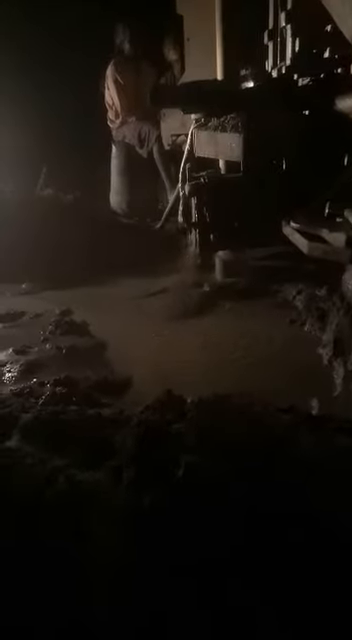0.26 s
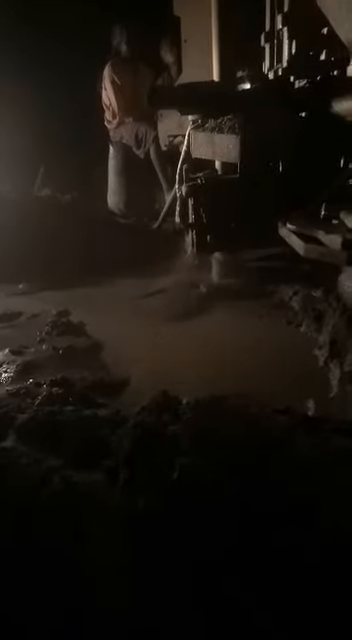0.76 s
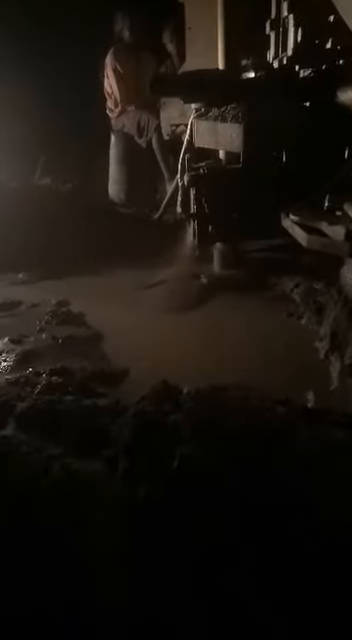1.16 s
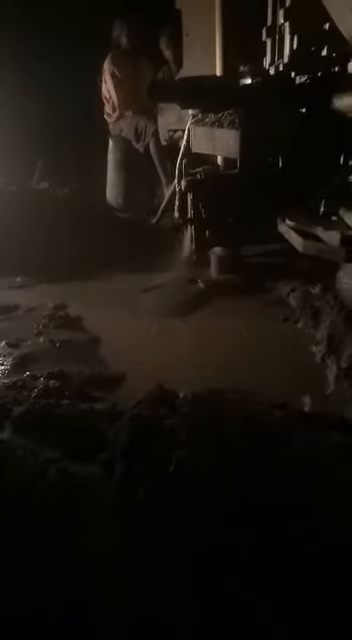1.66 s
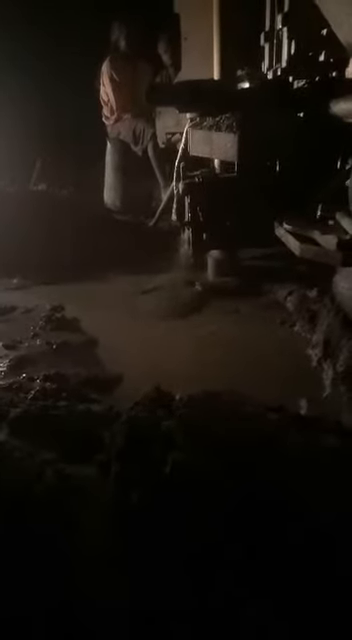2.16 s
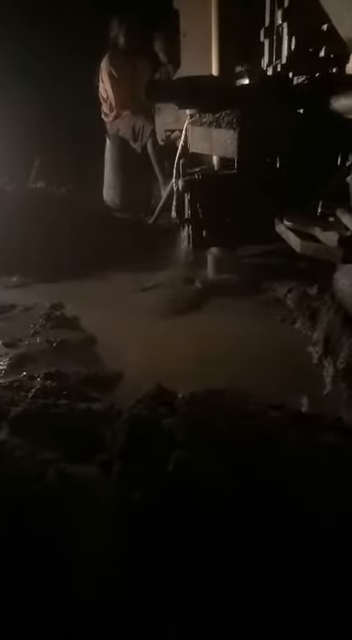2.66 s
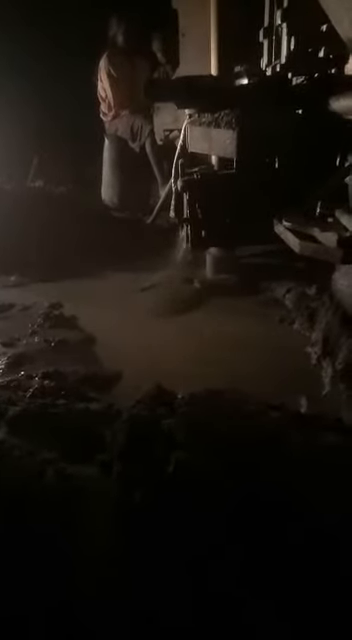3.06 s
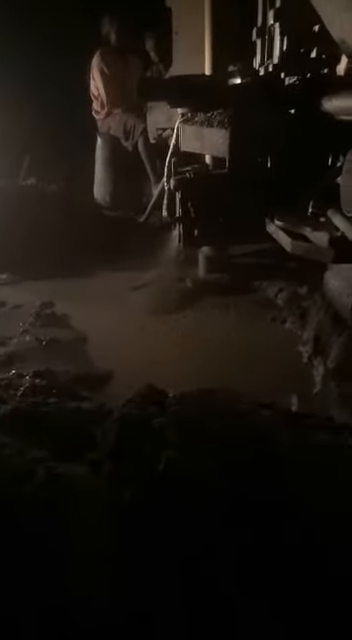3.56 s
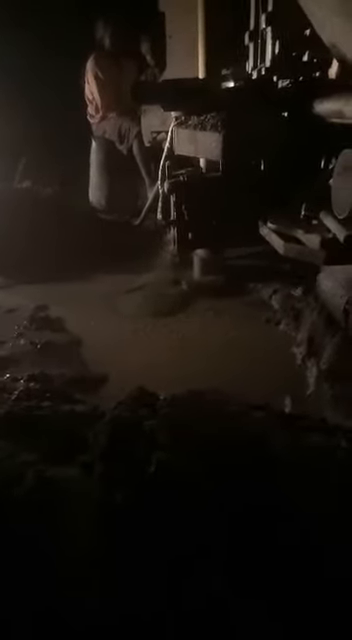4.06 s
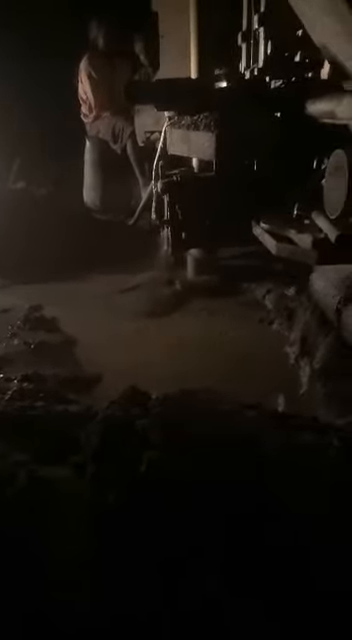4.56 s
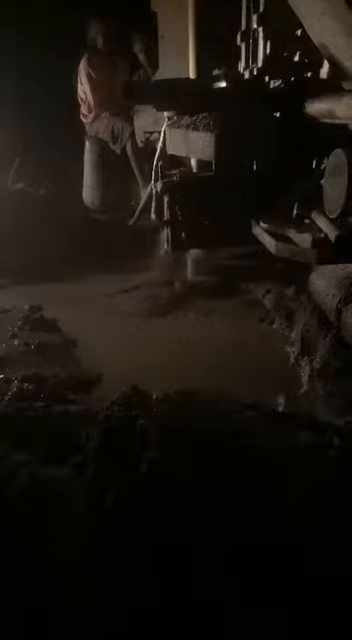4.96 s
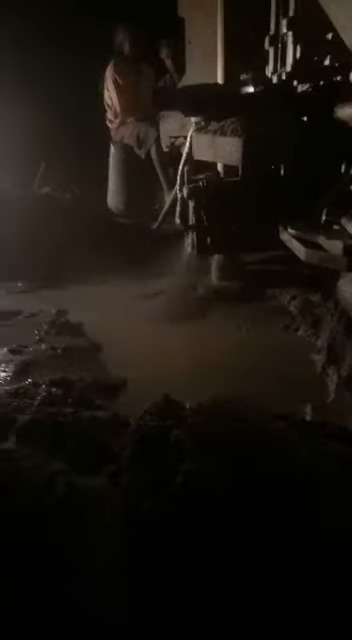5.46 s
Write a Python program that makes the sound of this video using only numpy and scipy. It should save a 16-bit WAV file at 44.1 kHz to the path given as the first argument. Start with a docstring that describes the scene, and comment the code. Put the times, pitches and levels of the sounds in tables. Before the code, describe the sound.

Dense, continuous machinery noise: low engine hum and hollow roaring from a frame and silencer, with a coarse bright rattle of covers and chains on top. Metallic squeals from the turning pipe come and go, irregular steel clanks break through, and the silencer hoots now and then. The pump hum sinks several times and the rattle eases at the end. Outdoor phone pickup from a few metres, limited on peaks.

```python
"""A drilling rig works at night beside its mud pit, heard for 5.7 s a few metres from a hand-held phone.
From the start sine waves hum for a six-cylinder diesel, a second engine and a pump, and whine for fast parts;
noise rings the booming frame, clicks and noise ring rattling steel and fill the din, and struck steel clanks.
At 0.1 s the rubbed drill pipe, noise and tones at four pitches, first sings out; at 0.2 s the roar dips.
From 0.6 s the silencer hoots now and then; the pump's hum sinks near 1.3, 2.15, 4 and 5 s; the rattle eases last."""
import sys
import numpy as np
from scipy import signal
from scipy.fft import rfft, irfft
from scipy.io import wavfile
from scipy.ndimage import uniform_filter1d, minimum_filter1d, map_coordinates

SR = 44100
rng = np.random.default_rng(int(sys.argv[2]) if len(sys.argv) > 2 else 0)


def master(y):
    """Save y as 16-bit WAV."""
    cut = np.clip(np.atleast_2d(y).T, -1, 1)
    pcm = np.round(cut * 32767)  # scale
    wavfile.write(sys.argv[1], SR, pcm.astype(np.int16))


N = 251811
TIME = np.arange(N) / SR
FREQ = np.maximum(np.fft.rfftfreq(N, 1 / SR), 1)  # in Hz, kept above zero for logs and division

CYCLE_HZ = 12.316  # main diesel: one four-stroke cycle, six firings
SHAFT_HZ = 29.3  # second engine
PUMP_HZ = 26.11  # pump shaft, eight vanes


def amp(db):
    """Turn decibels into a gain."""
    return 10 ** (np.asarray(db) / 20)


def unit(x):
    """Scale each channel to an average (rms) level of 1."""
    return x / np.sqrt(np.mean(x ** 2, axis=-1, keepdims=True))


def pan(db):
    """Left and right gains for a given left minus right difference in dB."""
    return amp(np.array([[0.5], [-0.5]]) * db)


def swells(table, depth=1):
    """Turn each level column into a gain around its own mean; depth scales its dB."""
    seconds, *columns = np.transpose(table)
    return [unit(amp(depth * np.interp(TIME, seconds, column))) for column in columns]


def spectrum(table):
    """Join each column of a table over log frequency."""
    hz, *columns = np.transpose(table)
    return [np.interp(np.log(FREQ), np.log(hz), column) for column in columns]


def bumps(events):
    """Add up rounded changes in dB, each with a middle, a length at half height and a size."""
    return sum(db * 0.5 ** ((2 * (TIME - middle) / length) ** 2) for middle, length, db in events)


def walk(rate):
    """Smooth chance movement of spread 1; a higher rate in Hz moves faster."""
    coarse = TIME[::100]
    hz = np.fft.rfftfreq(len(coarse), coarse[1])
    smoothing = np.exp(-(hz / rate) ** 2)
    slow = irfft(rfft(rng.standard_normal(len(coarse))) * smoothing, len(coarse))
    return unit(np.interp(TIME, coarse, slow))


def turns(hz, wobble, rate):
    """Count the turns of something steady that runs slightly ahead and behind."""
    return hz * TIME + wobble * walk(rate)


def strokes(turn, decay, scatter_db):
    """One blow on every turn, each of its own strength, dying away within a share of the turn."""
    number = np.floor(turn - np.floor(turn.min())).astype(int)
    size = amp(scatter_db * rng.standard_normal(number.max() + 1))
    return size[number] * np.exp(-(turn % 1) / decay)


def repeating(turn, size=2048):
    """The same random jolts on every turn."""
    jolts = rng.standard_normal(size)
    return unit(map_coordinates(jolts, [turn % 1 * size], order=1, mode="grid-wrap"))


# How sound reaches the phone's two microphone ports.
# Each row: frequency in Hz, likeness of the ports from 0 to 1, lead of the right port in ms.
PORTS = [(60.4, 0.97, .2), (220, 0.98, 0.3), (508, 0.98, 0.43), (700, 0.71, 0.21), (970, 0.31, 0.39),
         (1970, 0.4, 0.54), (5970, 0.25, 0.49)]


def ports(pair):
    """Spectra at the two ports: the bass arrives alike, the treble by unrelated reflections."""
    like, lead_ms = spectrum(PORTS)
    direct, scattered = rfft(pair)
    lead = np.exp(2j * np.pi * FREQ * lead_ms / 1000)
    return np.array([direct, like * lead * direct + np.sqrt(1 - like ** 2) * scattered])


def resonance(hz, width):
    """Response of one steep resonance."""
    return 1 / (1 + 1j * (FREQ / hz - hz / FREQ) * hz / width) ** 2


def ring(drive, hz, width, db, pan_db):
    """Ring one resonance at its level and place."""
    return unit(irfft(drive * resonance(hz, width), N)) * amp(db) * pan(pan_db)


def driven(sound, strength, hold_s):
    """Over spans longer than hold_s, the energy of a vibration follows the strength of its drive."""
    power = uniform_filter1d(np.mean(sound ** 2, axis=0), int(hold_s * SR) + 1)
    return sound * strength / unit(np.sqrt(power))


def drone(turn, rate_hz, orders, waver_db, lead_ms=0.29, pan_db=5.5):
    """Clean harmonics of one machine; the higher ones waver more with the load."""
    out = 0
    for multiple, db in orders:
        hz = multiple * rate_hz
        lead = np.array([[0], [hz * lead_ms / 1000]])  # in cycles, for the right port
        waver = waver_db * walk(4) * hz / 200  # waver_db is the spread at 200 Hz
        out = out + amp(db + waver) * np.sin(2 * np.pi * (multiple * turn + lead + rng.random()))
    return np.sqrt(2) * out * pan(pan_db)


def impacts(jolts, clicks_per_s=2500):
    """Dense small metal impacts over rushing air, bunched after each jolt of the engines."""
    clicks = (rng.random((2, N)) < clicks_per_s / SR) * rng.uniform(-0.92, 1, (2, N))
    rushing = rng.standard_normal((2, N))
    return ports(unit((1 + jolts) * (unit(clicks) + rushing)))


# Slow level of the loose parts; only its changes count, scaled by a depth.
# Each row: time in seconds, then heavy, middle and light parts in dB.
RATTLE_LEVEL = [(0.0, -28.5, -21, -29.5), (0.12, -21, -22, -24.5), (0.3, -23.5, -19.5, -30.5),
                (1.35, -23, -21, -24.5), (1.9, -21.5, -19, -24), (2.6, -23.5, -18, -25.5),
                (3.3, -22.5, -21.5, -24.5), (4.2, -22, -19.5, -28), (4.4, -24, -19.5, -23.5),
                (4.65, -24, -17.5, -23), (5.35, -22, -17.5, -22.5), (5.71, -24.5, -23, -31.5)]
# The whole rattle flares up or lets off.
# Each row: middle in seconds, length in seconds, change in dB.
FLURRIES = [(0.43, 0.02, -3), (0.76, 0.016, -1.5), (2.33, 0.049, -3), (2.89, 0.04, 0.5), (3.09, 0.054, 5),
            (3.52, 0.07, -2.5), (4.25, 0.044, -2), (4.605, 0.025, -1.5), (4.69, 0.031, -3)]
# Loose steel of middle weight clatters briefly, or once eases.
# Each row: middle in seconds, length in seconds, change in dB.
CLATTERS = [(0.098, 0.054, 7), (0.678, 0.045, 3), (0.893, 0.059, 5.5), (1.27, 0.028, 4),
            (1.355, 0.045, 4.5), (1.665, 0.046, 7), (1.841, 0.035, 4), (2.05, 0.03, 4), (2.122, 0.039, 2.5),
            (2.828, 0.04, 4), (3.039, 0.03, -1), (3.249, 0.028, 9), (3.444, 0.053, 5.5), (3.787, 0.029, 9),
            (4.406, 0.037, 7.5), (4.946, 0.036, 1), (5.42, 0.055, 2)]


def rattling(depth):
    """Strength of the heavy, middle and light loose parts; all share the flurries, the middle ones clatter."""
    heavy, middle, light = swells(RATTLE_LEVEL, depth)
    flurry = amp(bumps(FLURRIES))
    return [unit(part * flurry) for part in (heavy, middle * amp(bumps(CLATTERS)), light)]


# Broad mechanical noise between the resonances.
# Each row: frequency in Hz, level in dB per Hz, left minus right in dB.
DIN = [(20.0, -89, -2), (42.0, -70.5, 2), (109, -56, 7), (200.0, -53, 4.5), (576, -54.5, 10),
       (800, -56.5, 1), (1700, -64, 10), (2245, -62, 15.5), (3660, -66.5, 2.5), (4520, -71, 4),
       (6490, -88, 2), (8100, -104, -3), (11700, -100.8, -11), (14800.0, -104.2, 14)]


def din(jolts, centre_hz=3200, width_hz=3500, flutter_db=2.3, shaken=0.52):
    """Fans, mud flow and valve gear fill the gaps; the bright band follows the rattle, the rest stays even."""
    db, pan_db = spectrum(DIN)
    sound = impacts(shaken * jolts) * amp(db) * pan(pan_db) * np.sqrt(SR / 2)
    bright = 1 / (1 + ((FREQ / centre_hz - centre_hz / FREQ) * centre_hz / width_hz) ** 2)
    light = rattling(depth=0.29)[-1]
    swell = light * amp(flutter_db * walk(23))
    return irfft(sound * (1 - bright), N) + swell * irfft(sound * bright, N)


# Gear and turbocharger whines.
# Each row: frequency in Hz, level in dB, left minus right in dB.
WHINES = [(763.6, -45, 4), (2737, -53.5, 10), (3198, -45.3, 9), (3746, -56, 9), (3880, -57, 8),
          (5237, -60, 10), (9405, -81, 2)]


def whines(wobble_turns=0.29, waver_db=3):
    """Thin, unsteady tones of fast-turning parts."""
    out = 0
    for hz, db, pan_db in WHINES:
        tone = np.sin(2 * np.pi * turns(hz, wobble_turns, 4.7))
        out = out + unit(tone * amp(waver_db * walk(21))) * amp(db) * pan(pan_db)
    return out


# Clean tones of the pump. Each row: multiple of its shaft rate, level in dB.
PUMP = [(1, -57), (3, -53), (8, -34.5)]
# Slow level of the pump's hum; only its changes count. Each row: time in seconds, level in dB.
PUMP_LEVEL = [(0, -32.5), (0.85, -33.5), (1.3, -52), (1.7, -34), (2.15, -61), (2.45, -36), (2.75, -30.5),
              (3.2, -31.5), (3.42, -40), (3.65, -31), (4.0, -49), (4.55, -34), (4.95, -46), (5.25, -41),
              (5.71, -37)]


def pump_hum(turn):
    """The pump's shaft and its eight passing vanes hum, sinking now and then."""
    return drone(turn, PUMP_HZ, PUMP, waver_db=1.2) * swells(PUMP_LEVEL)[0]


# Clean tones of the second engine. Each row: multiple of its shaft rate, level in dB.
SECOND_ENGINE = [(2, -49.5), (8, -37.5)]
# Its hum swells or sinks. Each row: middle in seconds, length in seconds, change in dB.
SECOND_SWELLS = [(0.4, 0.2, -2), (1.08, 0.16, 7), (1.85, 0.08, 7), (2.2, 0.11, 6), (2.6, 0.12, 8),
                 (3.25, 0.093, 2)]


def second_engine(shaft):
    """The second engine hums at multiples of its shaft rate."""
    return drone(shaft, SHAFT_HZ, SECOND_ENGINE, waver_db=2.0) * unit(amp(bumps(SECOND_SWELLS)))


# The pipe catches and one mode sings out.
# Each row: middle in seconds, length in seconds, rough mode frequency in Hz, rise in dB.
SQUEALS = [(0.113, 0.078, 2237, 8.5), (0.144, 0.08, 1832, 3), (0.646, 0.056, 2237, 7.5),
           (0.9, 0.17, 1371, 5), (1.11, 0.042, 1832, 6.5), (1.01, 0.08, 2237, 5.5), (1.17, 0.33, 2237, 7.5),
           (1.46, 0.1, 2237, 3.5), (1.633, 0.22, 1832, 4), (2.3, 0.12, 2237, 4), (1.792, 0.035, 2237, 10),
           (2.815, 0.085, 1832, 6.5), (3.0, 0.16, 2237, 5), (3.27, 0.15, 1832, 0), (3.37, 0.45, 1371, 5),
           (3.46, 0.11, 2237, 9.5), (3.63, 0.082, 4046, 11), (3.875, 0.091, 2237, 4),
           (3.977, 0.17, 1832, 3.5), (4.037, 0.11, 2237, 4.5), (4.24, 0.05, 1832, 4.5),
           (4.424, 0.11, 1832, 1), (4.404, 0.18, 1371, 6), (4.45, 0.13, 2237, 3), (4.656, 0.13, 2237, 9),
           (4.935, 0.07, 2237, 6.5), (4.925, 0.24, 1832, 4), (5.13, 0.16, 1832, 3), (5.166, 0.09, 2237, 5),
           (5.336, 0.27, 1371, 7.5), (5.497, 0.13, 4046, 10), (5.597, 0.11, 2237, 10.5)]


def rubbing(hz, swing_db, turn_hz=1.84, crest_s=0.035, fits_db=2.24):
    """Strength of one mode: each turn presses the pipe on its guide, with squeals and chance fits on top."""
    own = [(middle, length, db) for middle, length, mode_hz, db in SQUEALS if abs(mode_hz / hz - 1) < 0.1]
    press = np.cos(2 * np.pi * turn_hz * (TIME - crest_s))
    return unit(amp(swing_db * press + bumps(own) + fits_db * walk(34)))


# Modes of the rubbing drill pipe, the ways it can ring.
# Each row: frequency in Hz, width in Hz, level in dB, left minus right in dB.
PIPE = [(1378, 48, -35, 6), (1830, 28, -35.6, 8.5), (2241, 22, -36.8, 14), (4038, 58, -43.5, 6)]
# Swing of each mode, low to high, either way over a turn of the pipe, in dB.
PIPE_SWING_DB = [0.35, 0.54, 0.72, 0.6]
# Strength of rubbing, relative to its mean, at which each mode locks into a tone (no unit).
PIPE_LOCKS_AT = [1.7, 1.15, 1.15, 2.8]


def drill_pipe(wobble_per_hz=0.017):
    """Friction keeps four modes singing; rubbed hard, a mode locks into a wandering tone."""
    drive = ports(rng.standard_normal((2, N)))
    out = 0
    for (hz, width, db, pan_db), swing_db, locks_at in zip(PIPE, PIPE_SWING_DB, PIPE_LOCKS_AT):
        strength = rubbing(hz, swing_db)
        clean = strength ** 4 / (strength ** 4 + locks_at ** 4)  # share of energy in the tone
        wander = turns(hz, wobble_per_hz * width, 4.2)
        tone = unit(np.sin(2 * np.pi * wander)) * amp(db) * pan(pan_db)
        rough = ring(drive, hz, width, db, pan_db)
        mixed = np.sqrt(clean) * tone + np.sqrt(1 - clean) * rough
        out = out + driven(mixed, strength, hold_s=0.052)
    return out


# Resonances of covers, chains and pipe rack, also rung by the clanks.
# Each row: frequency in Hz, width in Hz, level in dB, left minus right in dB.
STEEL = [(930.5, 74, -34, 7), (1040, 59, -34, 2.5), (1194, 75, -35, -2), (1342, 17.6, -38, 9.5),
         (1502, 93, -30.5, -0.5), (1717, 40, -42.5, 8.5), (1872, 64, -39.5, 7.5), (2506, 60, -38, 14),
         (2650, 140, -38, 13.5), (2843, 60, -37, 9.5), (3016, 75, -43, 13.5), (3222, 48, -41, 11.5),
         (3407, 130, -42, 14), (3655, 510, -38.5, 13), (3904, 29, -47, 13)]


def rattle(jolts, fits_db=2.0):
    """The impacts ring covers, chains and racked pipes; each resonance chatters in its own fits."""
    drive = impacts(jolts)
    parts = STEEL[:7], STEEL[7:13], STEEL[13:]  # heavy, middle, light
    out = 0
    for modes, strength in zip(parts, rattling(depth=0.86)):
        sound = sum(ring(drive, *mode) * unit(amp(fits_db * walk(11.5))) for mode in modes)
        out = out + driven(sound, strength, hold_s=0.073)
    return out


# Loose steel strikes; the sizes are relative to each other.
# Each row: start in seconds, heavy parts in dB, lighter parts in dB.
CLANKS = [(0.075, -7, -12), (0.167, 1, 1), (0.468, -5, -4), (0.79, -7, -13), (0.818, -11, -1),
          (1.121, -5, -13), (1.255, -9, -7), (1.328, -1.5, -1), (1.434, -1, -16), (1.63, -2, -12),
          (2.138, -4, -5), (2.252, -1.5, -8), (2.515, 1, 0.5), (2.562, 2.5, 1), (2.794, -2, -10),
          (3.095, -2, -4), (3.404, 4, -11), (3.636, -6, -1), (4.268, -4, -18), (4.358, -0.5, 2),
          (4.557, -1, -2), (4.955, 3.5, 1), (5.252, 2, -11), (5.41, 3, -6), (5.489, -9, -0.5)]


def clanks(chatter_s=0.015, contacts_per_s=900, level_db=-33):
    """Loose steel strikes: a first contact and a quickly dying chatter ring the heavy and lighter parts."""
    drives = np.zeros((2, 2, N))  # heavy or lighter, port, time
    after = TIME[:SR // 10]
    shape = (2, len(after))
    for start_s, *sizes_db in CLANKS:
        contacts = (rng.random(shape) < contacts_per_s / SR) * rng.standard_normal(shape)
        contacts[:, 0] = 1
        blow = unit(contacts * np.exp(-after / chatter_s))
        start = int(start_s * SR)
        drives[:, :, start:start + len(after)] += amp(sizes_db)[:, None, None] * blow
    out = 0
    for drive, modes in zip(drives, (STEEL[:7], STEEL[7:])):
        response = sum(amp(db) * pan(pan_db) / np.sqrt(width) * resonance(hz, width)
                       for hz, width, db, pan_db in modes)
        out = out + ports(drive) * response
    sound = irfft(out, N)
    return sound * amp(level_db) / np.sqrt(np.mean(sound ** 2))


# Slow level of the low boom; only its changes count, scaled by a depth.
# Each row: time in seconds, level in dB.
BOOM_LEVEL = [(0.0, -20), (0.2, -33), (0.3, -28), (0.42, -37), (0.55, -27), (0.8, -23.5), (1.08, -20.5),
              (1.3, -25), (1.43, -28), (1.6, -26), (1.82, -23), (2.01, -29), (2.3, -21), (2.65, -22),
              (3.26, -25), (3.9, -34), (4.52, -25), (5.15, -35), (5.71, -33)]
# The load surges or slackens and the roar follows, the lower roar by a share of it.
# Each row: middle in seconds, length in seconds, change in dB.
SURGES = [(0.11, 0.06, 2), (0.205, 0.048, -15), (0.295, 0.056, 10), (0.345, 0.03, -7), (0.398, 0.046, 8.5),
          (0.5, 0.08, -3), (0.62, 0.1, 4.5), (0.776, 0.032, -10), (0.865, 0.052, 10.5), (0.92, 0.022, -6),
          (1.07, 0.075, -7.5), (1.19, 0.029, 5), (1.3, 0.048, -1.5), (1.52, 0.14, 0.8), (1.7, 0.12, 1.8),
          (2.02, 0.16, 3.5), (2.25, 0.1, -2), (2.365, 0.044, 7), (2.53, 0.044, -6.5), (2.6, 0.033, 7.5),
          (2.78, 0.027, 2), (2.94, 0.057, 3), (3.31, 0.025, -3), (3.35, 0.034, 3.5), (3.42, 0.046, 6.5),
          (3.5, 0.033, 2.5), (3.56, 0.045, -4), (3.815, 0.09, 5), (4.0, 0.06, -3.5), (4.31, 0.068, 4.5),
          (4.42, 0.13, -1), (4.6, 0.06, -4.5), (4.745, 0.022, -6), (5.03, 0.1, -3), (5.19, 0.062, 2),
          (5.42, 0.07, 6), (5.66, 0.12, 3), (5.524, 0.028, -4)]
# The deck thrums louder or falls away. Each row: middle in seconds, length in seconds, change in dB.
THRUMS = [(0.15, 0.1, -11), (0.53, 0.12, 7), (0.67, 0.07, 10), (1.2, 0.05, -8), (1.36, 0.15, 5),
          (1.57, 0.096, 9), (1.71, 0.09, 8.5), (2.55, 0.066, 7.5), (2.74, 0.036, 8.5), (2.91, 0.06, 7.5),
          (3.23, 0.08, 7), (3.38, 0.06, 8), (4.9, 0.069, -13), (5.22, 0.065, 7), (5.4, 0.13, 5),
          (5.57, 0.064, -9)]
# The silencer's narrowest resonance hoots or sinks.
# Each row: middle in seconds, length in seconds, change in dB.
HOOTS = [(0.32, 0.1, -3), (0.64, 0.2, 13), (1.75, 0.12, 13.5), (1.94, 0.14, 14.5), (2.4, 0.14, -10),
         (3.05, 0.12, 15), (3.55, 0.16, 7.5), (4.1, 0.085, 14), (4.3, 0.12, 13.5), (4.54, 0.038, 17),
         (4.76, 0.24, 13), (5.17, 0.15, 14)]
# The high drumming swells or sinks. Each row: middle in seconds, length in seconds, change in dB.
DRUM_SWELLS = [(0.48, 0.12, 3.5), (0.63, 0.1, -3.5), (1.35, 0.25, -1.5), (2.25, 0.051, 2.5),
               (2.42, 0.018, 9.5), (2.6, 0.076, 4.5), (3.05, 0.099, 4.5), (3.48, 0.055, 4),
               (3.73, 0.085, -0.5), (3.93, 0.17, 2.5), (4.13, 0.094, -14), (4.5, 0.35, -3.5),
               (4.81, 0.055, 9.5), (5.45, 0.24, -7.5), (5.68, 0.049, 6.5)]


def shaking(fall_db_per_s=0.1, lower_share=0.8, fits_db=1.17):
    """Strength of the low boom, thrum, lower roar, upper roar, hoot and high drumming."""
    boom = swells(BOOM_LEVEL, depth=0.82)[0]
    roar_db = bumps(SURGES) - fall_db_per_s * TIME  # the roar dies down a little as the drilling goes on
    thrum, hoot, drum = amp(bumps(THRUMS)), amp(bumps(HOOTS)), amp(bumps(DRUM_SWELLS))
    parts = boom, thrum, amp(lower_share * roar_db), amp(roar_db), hoot, drum
    return [unit(part * amp(fits_db * walk(19))) for part in parts]


# Resonances of the frame and silencer.
# Each row: frequency in Hz, width in Hz, level in dB, left minus right in dB.
BODY = [(222.5, 32.5, -33.5, 2), (288.4, 33, -30.5, 4), (351.6, 12.4, -35.5, 7), (375.7, 8, -30.5, 0),
        (398.8, 37, -27, 3), (484, 21, -33.5, -5.5), (524, 77, -23.5, 2), (582.4, 13, -37.5, 10.5),
        (732.3, 56, -28, 7)]


def frame(firing, cycle, shaft, puff=0.45, knock=0.47, regular=0.19):
    """Gas puffs of the six cylinders and repeating jolts shake the frame and silencer."""
    gate = 1 + puff * firing + knock * np.cos(2 * np.pi * shaft)
    drive = ports([gate * rng.standard_normal(N) + regular * repeating(cycle) for _ in range(2)])
    # boom, thrum, lower roar, upper roar, hoot, drumming
    parts = BODY[:1], BODY[1:2], BODY[2:3] + BODY[4:5], BODY[5:8], BODY[3:4], BODY[8:]
    out = 0
    for modes, strength in zip(parts, shaking()):
        sound = sum(ring(drive, *mode) for mode in modes)
        out = out + driven(sound, strength, hold_s=0.048)
    return out


# Clean tones of the main diesel. Each row: multiple of its cycle rate, level in dB.
EXHAUST = [(2, -52), (6, -35), (10, -46), (11, -49), (12, -33.5), (14, -42.5), (15, -44.5), (18, -43),
           (19, -48)]
# Its hum swells or sinks with its load. Each row: middle in seconds, length in seconds, change in dB.
DIESEL_SWELLS = [(0.81, 0.063, 5.5), (2.17, 0.17, -0.5), (3.06, 0.22, 5.5), (4.15, 0.23, -1),
                 (4.56, 0.28, 1.5), (5.3, 0.54, 2)]


def diesel(cycle):
    """The main diesel drones at multiples of its four-stroke cycle, the sixth being its firing rate."""
    return drone(cycle, CYCLE_HZ, EXHAUST, waver_db=1.0) * unit(amp(bumps(DIESEL_SWELLS)))


def scene(firing_jolt=0.28, shaft_jolt=0.59, knock_lead_s=0.006):
    """Three shafts drive the hums; the two engines also shake the frame and the loose steel."""
    cycle = turns(CYCLE_HZ, wobble=0.0029, rate=1.0)
    shaft = turns(SHAFT_HZ, wobble=0.0063, rate=1.1)
    pump = turns(PUMP_HZ, wobble=0.012, rate=2)
    firing = strokes(6 * cycle, decay=0.3, scatter_db=4)
    # the second engine's knock comes just before its turn
    knock = strokes(shaft + SHAFT_HZ * knock_lead_s, decay=0.3, scatter_db=3)
    jolts = firing_jolt * firing + shaft_jolt * knock
    background = din(jolts) + whines() + pump_hum(pump) + second_engine(shaft)
    metal = drill_pipe() + rattle(jolts) + clanks()
    return background + metal + frame(firing, cycle, shaft) + diesel(cycle)


def record(dry, ceiling=0.56, top_hz=15000):
    """The phone's limiter eases the gain down around peaks over the ceiling; ends are soft, the top is cut."""
    needed = np.minimum(1, ceiling / np.abs(dry).max(axis=0))
    gain = minimum_filter1d(needed, size=300)
    for _ in range(2):
        gain = uniform_filter1d(gain, size=150)
    ease = np.minimum(1, np.minimum(TIME, TIME[::-1]) / 0.002)
    top_cut = signal.ellip(12, 0.1, 80, top_hz, fs=SR, output="sos")
    return signal.sosfilt(top_cut, dry * gain * ease)


dry = scene()
out = record(dry)
master(out)
```